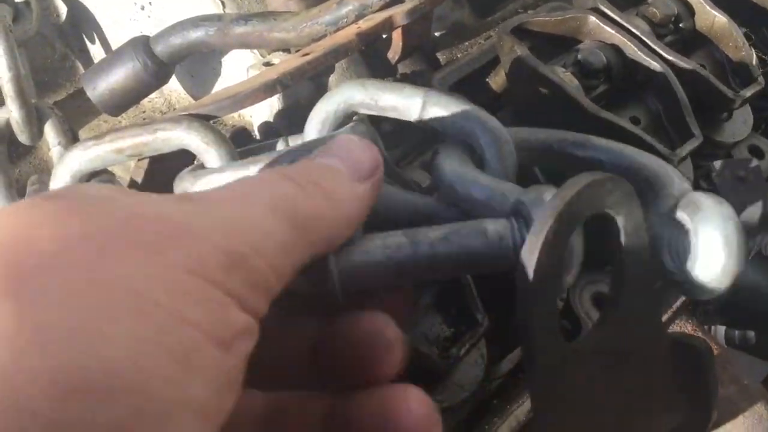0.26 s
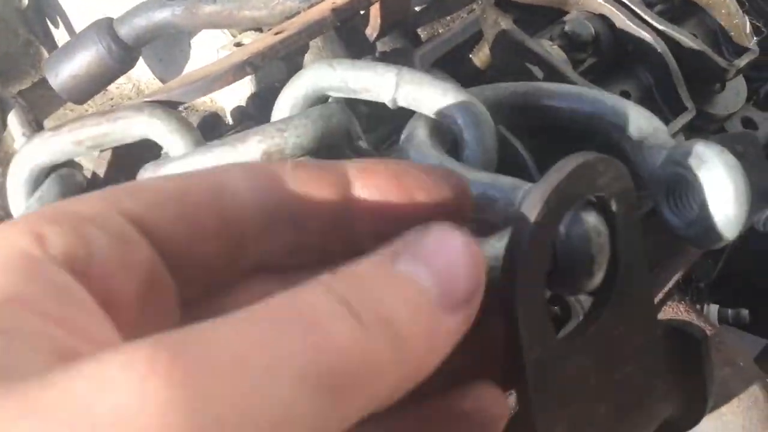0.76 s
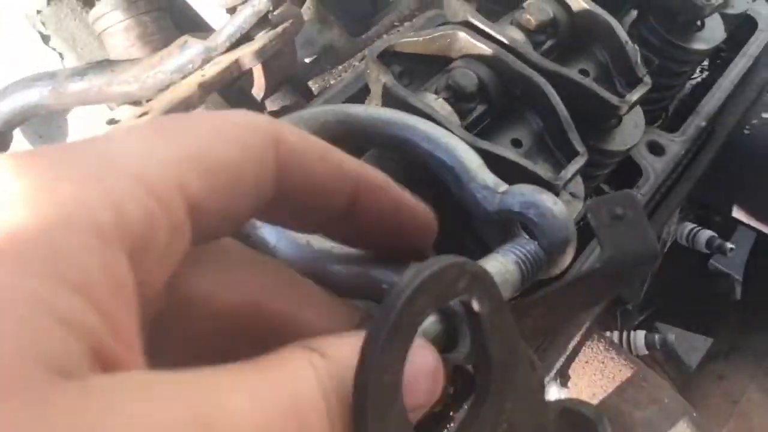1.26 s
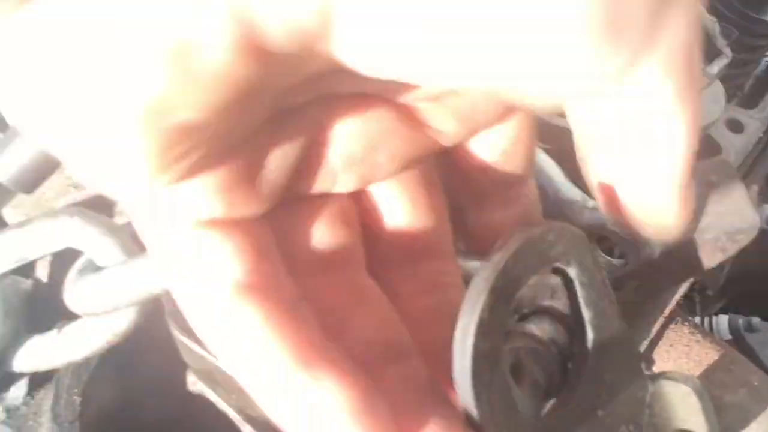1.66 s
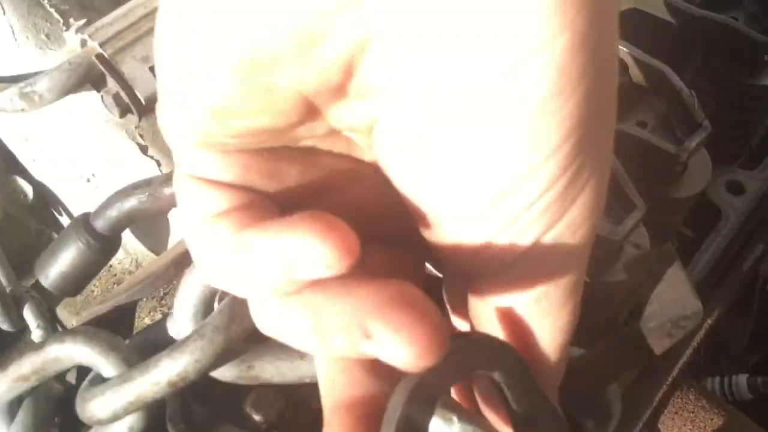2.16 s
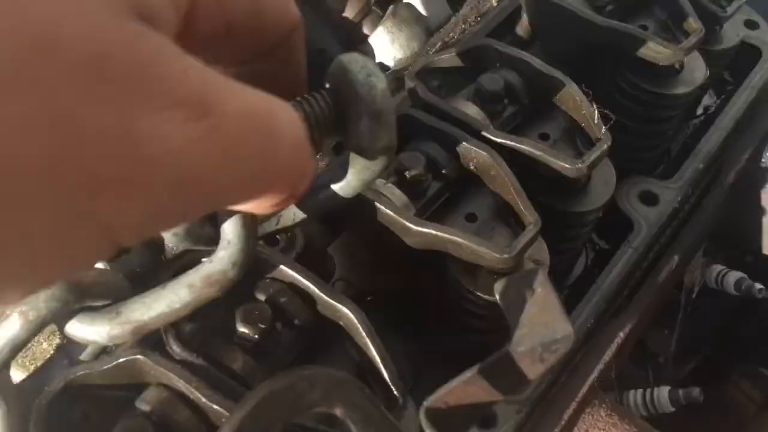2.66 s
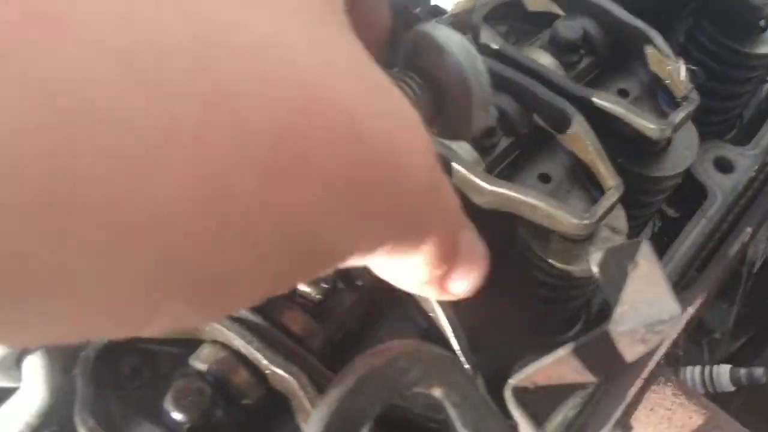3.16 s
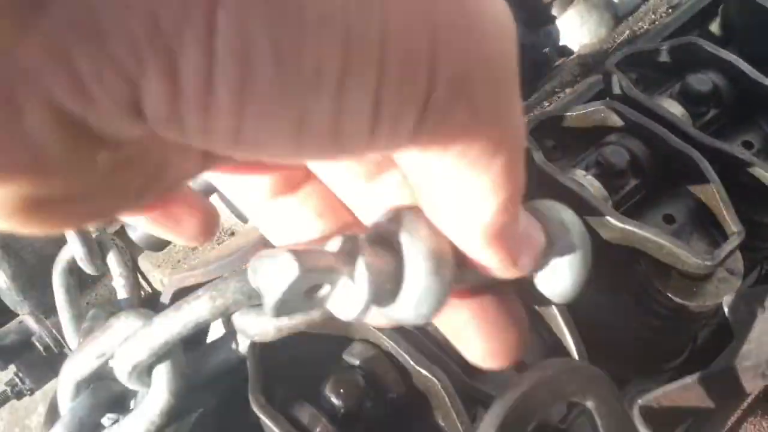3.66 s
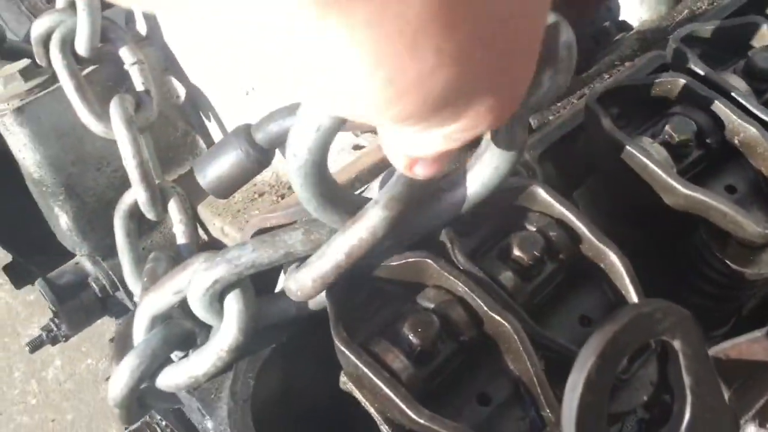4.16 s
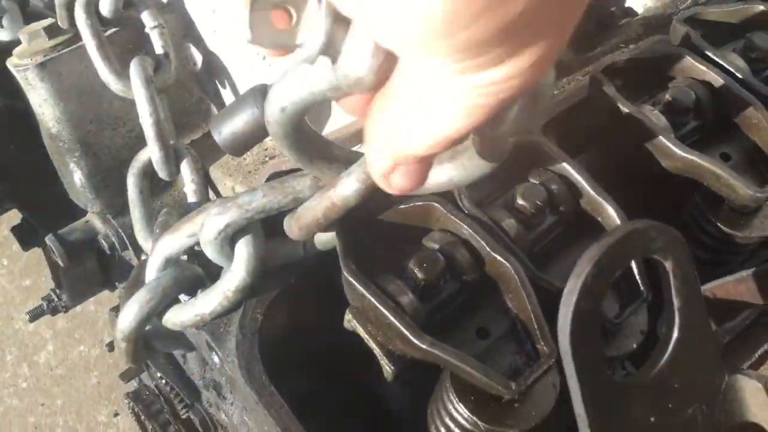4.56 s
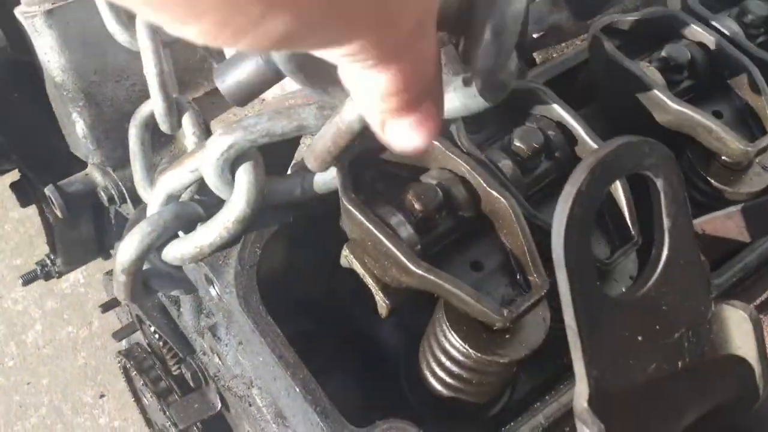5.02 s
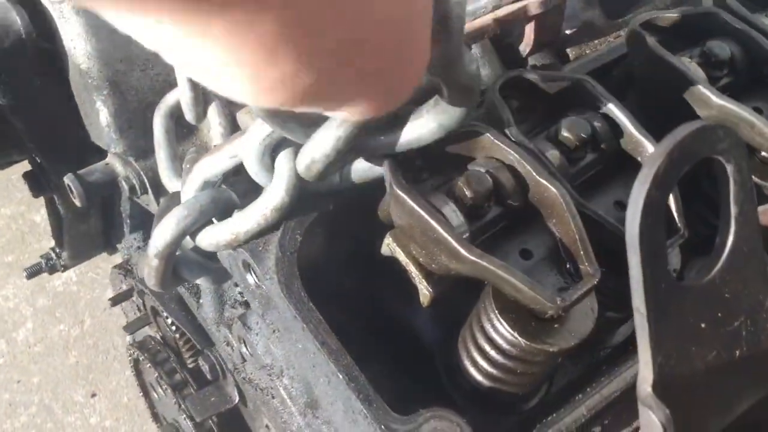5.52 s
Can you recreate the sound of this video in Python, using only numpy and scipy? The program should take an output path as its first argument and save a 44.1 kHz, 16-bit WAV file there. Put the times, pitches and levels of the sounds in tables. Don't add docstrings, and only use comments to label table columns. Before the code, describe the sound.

Close, bright metal knocks and jingling links with small thread scrapes as a shackle is worked loose, distant road hum swelling underneath.

```python
import sys
import numpy as np
from scipy import signal
from scipy.fft import rfft, irfft, next_fast_len
from scipy.io import wavfile
from scipy.ndimage import uniform_filter1d, minimum_filter1d, map_coordinates

SR = 44100
rng = np.random.default_rng(int(sys.argv[2]) if len(sys.argv) > 2 else 0)


def store_wav(level_fs):
    pcm = np.round(np.clip(np.atleast_2d(level_fs), -1, 1) * 32767)
    wavfile.write(sys.argv[1], SR, pcm.T.astype(np.int16))


def invert_db(level):
    return 10 ** (np.asarray(level, dtype=float) / 20)


N = 255318

# mode_hz [Hz], level_db [dB]
BRACKET = [(850, -16), (990, -15), (1360, -8), (1785, -8), (2200, -8), (2440, -4), (2620, -4), (3610, -6),
           (3940, -12), (4380, -6)]
BOW = [(4770, -12), (4920, -1.5), (5500, -12), (5850, -9), (7100, -6)]
LINKS = [(8600, -14), (9000, -16), (9995, -2), (10360, -4), (10970, -6), (11470, -8), (12075, -8)]
PIN = [(12460, -6), (12680, -3), (13300, -18), (13690, -4), (15395, -7)]
# mode_hz [Hz], level_db [dB]
FREE_BOW = [(4770, -1.5), (4920, -9), (5990, -1.5), (6915, -12), (7285, -4)]
FREE_LOW = [(1390, -6), (2530, -1.5), (4330, -9)]
FREE_LINKS = [(10010, -1), (10360, -3), (10970, -11), (11550, -12), (12075, -16)]

# start_s [s], bow_peak_db [dB], nearest_mode_hz [Hz], ring_t60_s [s],
# bracket_against_bow_db [dB]
PULL_HEAVY = [(0.0153, -10, 5780, 0.03, -7.5), (0.1719, -12.5, 4760, 0.031, -10),
              (0.1817, -5.5, 5900, 0.067, -10.5), (0.2635, -7.5, 5940, 0.019, -8),
              (0.2789, -9.5, 3530, 0.047, -6), (0.3359, -7.5, 2530, 0.067, 2.5),
              (0.6847, -10.5, 4930, 0.1, -2.5), (0.7144, -4, 7100, 0.058, -8.5),
              (0.7512, -14, 4920, 0.073, -7), (0.8193, -29, 2420, 0.19, 11),
              (0.857, -21, 2440, 0.036, -0.5), (0.9913, -13.5, 4930, 0.12, 1),
              (1.019, -27, 4930, 0.066, -2), (1.0333, -10.5, 4940, 0.12, -9.5),
              (1.0714, -17.5, 4930, 0.05, 2), (1.0779, -2, 4940, 0.036, -13.5),
              (1.1243, -19.5, 5050, 0.11, -9.5), (1.2419, -3.5, 4930, 0.072, -9),
              (1.365, -22.5, 5600, 0.052, -0.5)]
LIFT_HEAVY = [(1.5174, -17.5, 7270, 0.016, -6), (1.532, -17.5, 4950, 0.11, 1),
              (1.8571, 5.5, 7100, 0.011, -25), (2.0753, -11, 5500, 0.033, -3),
              (2.0946, -27, 2600, 0.096, 13.5), (2.1974, -14.5, 7040, 0.017, -14),
              (2.2238, -15, 7150, 0.027, -9.5), (2.4058, -2, 5480, 0.033, -8),
              (2.5289, -18.5, 7390, 0.13, -14.5), (2.5541, -3, 3890, 0.016, -8),
              (2.584, -2, 5900, 0.033, -5), (2.614, -10, 5940, 0.038, -3.5),
              (2.6602, -8.5, 4860, 0.039, -8)]
THREAD_HEAVY = [(3.039, -14.5, 5050, 0.02, -6.5), (3.0949, -10.5, 6000, 0.093, -9.5),
                (3.1244, -11, 7290, 0.05, -13), (3.139, -12.5, 4920, 0.052, -14),
                (3.3686, -6, 4750, 0.11, -7.5), (3.386, -22.5, 4740, 0.1, -15),
                (3.399, -9, 4760, 0.21, -29), (3.418, -6.5, 5980, 0.2, -28), (3.433, -4, 5950, 0.092, -22),
                (3.4364, 2.5, 5990, 0.13, -11.5), (3.48, -5, 5990, 0.042, -12.5),
                (3.5084, -20, 4930, 0.096, -14), (3.5216, -13.5, 4970, 0.041, -4.5),
                (3.5641, -12.5, 4850, 0.092, -4.5), (3.7293, -17, 5900, 0.04, -11),
                (3.932, -17.5, 4790, 0.27, -14), (3.971, -23.5, 4760, 0.24, -7),
                (4.0596, 3, 4770, 0.057, -34), (4.1599, 2, 7270, 0.073, -13.5),
                (4.128, -17.5, 7290, 0.19, -12), (4.167, -26, 2580, 0.098, 7.5),
                (4.223, -19, 5670, 0.017, -7)]
SCREW_HEAVY = [(4.559, -23.5, 4980, 0.032, 0), (4.7528, -28, 2540, 0.084, 3.5),
               (4.765, -12, 6020, 0.05, -29), (4.8264, -14, 3300, 0.034, 1.5),
               (4.8854, -14.5, 7330, 0.046, -14), (4.9269, -16.5, 7320, 0.045, -11),
               (4.977, -17, 7320, 0.042, -5.5), (4.9993, 8, 6010, 0.039, -24),
               (5.083, -13.5, 5400, 0.025, -5.5), (5.2706, -21.5, 5400, 0.055, -0.5),
               (5.29, -5.5, 6900, 0.05, -6.5), (5.317, -6, 7310, 0.025, -8),
               (5.3673, -12, 5780, 0.028, -6.5), (5.5526, -11, 7290, 0.071, -11),
               (5.586, -9, 7310, 0.041, -17)]
# start_s [s], links_peak_db [dB], nearest_mode_hz [Hz], ring_t60_s [s],
# pin_against_links_db [dB]
PULL_LIGHT = [(0.0162, -15, 9350, 0.015, -7), (0.1585, -34, 12400, 0.11, 8), (0.181, -21, 12400, 0.13, 7.5),
              (0.264, -23, 10100, 0.028, 3), (0.2778, -16, 12500, 0.029, 16.5),
              (0.3361, -5, 12100, 0.13, -11.5), (0.3365, 1, 11470, 0.039, -16.5),
              (0.338, -4.5, 10970, 0.1, -20), (0.6854, -18, 8610, 0.1, -3),
              (0.7025, -17.5, 12400, 0.094, 7.5), (0.7151, -13.5, 8620, 0.063, -6),
              (0.752, -17.5, 8600, 0.039, -25), (0.9922, -28.5, 8610, 0.21, -14.5),
              (1.0716, -20, 13700, 0.09, 1.5), (1.08, -13.5, 9970, 0.055, -27),
              (1.2421, -2.5, 10000, 0.048, -6), (1.2524, -14, 12700, 0.032, 8.5)]
LIFT_LIGHT = [(1.5295, -35.5, 12800, 0.058, 16), (1.8574, -10.5, 12600, 0.038, 15),
              (2.075, -24.5, 11600, 0.031, -20), (2.095, -20.5, 8980, 0.041, -28),
              (2.1982, -39, 12500, 0.13, 22), (2.2238, -18, 8470, 0.025, -20),
              (2.243, -23, 10900, 0.12, -38.5), (2.406, -12.5, 11600, 0.043, -3),
              (2.553, -20.5, 11600, 0.058, -4), (2.5848, -15, 11600, 0.055, -0.5),
              (2.6167, -6, 10100, 0.034, 2.5), (2.6605, -20.5, 10400, 0.044, 7.5)]
THREAD_LIGHT = [(3.0978, -11, 10000, 0.025, -6.5), (3.1246, -19.5, 12500, 0.1, 11.5),
                (3.372, -13.5, 12700, 0.1, 4.5), (3.3886, -11.5, 10400, 0.13, -24.5),
                (3.4303, -8, 9980, 0.23, -0.5), (3.4459, -11.5, 9990, 0.12, -0.5),
                (3.4661, -15, 12700, 0.065, 10.5), (3.483, -18.5, 11550, 0.11, -16.5),
                (3.564, -27.5, 15395, 0.11, 5.5), (3.7292, -40, 12600, 0.1, 5),
                (3.5193, -31.5, 12700, 0.07, 10), (3.924, -41, 12600, 0.078, 14),
                (3.9738, -26, 10000, 0.21, -21.5), (4.0615, -25.5, 13700, 0.082, 12),
                (4.1087, -21, 10900, 0.13, -11), (4.128, -19, 12500, 0.21, 11),
                (4.1599, -9.5, 12550, 0.081, 14.5), (4.1705, -8, 12700, 0.085, 4.5)]
SCREW_LIGHT = [(4.5615, -50, 12800, 0.025, 29.5), (4.8265, -25.5, 12100, 0.089, -4),
               (4.8853, -21, 12160, 0.034, 12), (4.9271, -31.5, 10500, 0.26, 3.5),
               (4.999, -8.5, 11000, 0.098, -1.5), (5.2926, -21, 10010, 0.1, -4),
               (5.291, -4.5, 10970, 0.1, -23), (5.294, -11, 12075, 0.11, -21),
               (5.3684, -18, 10100, 0.059, -2.5), (5.4277, -28, 13700, 0.054, 10.5),
               (5.553, -25, 10400, 0.07, 0.5), (5.586, -22, 11600, 0.054, -2)]
# start_s [s], peak_db [dB], nearest_mode_hz [Hz],
# links_and_pin_against_it_db [dB]
TAPS = [(0.151, -30, 2500, -23), (0.2278, -21, 2700, -9), (0.474, -37, 2850, -25),
        (0.897, -30.5, 1860, -17), (1.511, -25, 7400, -19), (2.4485, -21.5, 6130, -26),
        (3.072, -34, 2320, -22), (3.245, -22, 2520, -7), (3.3008, -23, 4900, -7), (3.3594, -15, 4770, -14),
        (4.003, -17, 6050, -19), (4.3525, -40, 7300, -2), (4.4084, -37.5, 2660, -34),
        (4.53, -34.5, 4330, -39), (4.588, -28.5, 5270, -11), (5.1454, -24.5, 2240, -12),
        (5.4296, -22.5, 6090, 2.5), (5.623, -23, 4980, -6), (5.756, -21.5, 2710, -17),
        (0.158, -23.5, 4770, -18), (0.333, -10.5, 5900, -8), (0.384, -23, 5850, -15),
        (0.9753, -38, 4940, -4), (1.3526, -39, 1950, -17), (1.8245, -31.5, 4870, -21),
        (1.877, -33, 3700, -20), (2.2923, -32, 2990, -23), (2.364, -37, 2760, -20), (2.391, -27, 3750, -17),
        (2.445, -25, 3800, -18), (2.4723, -27, 6160, -20), (2.5102, -31, 4990, -1),
        (3.0194, -45, 2540, -30), (3.207, -32.5, 2510, -7), (3.3326, -25, 1520, -19),
        (3.8904, -40, 1810, -9), (4.016, -25, 7280, -20), (4.0415, -37, 6000, -8), (4.0807, -23, 4770, -6),
        (4.108, -17.5, 4300, -15), (4.239, -29, 3600, -24), (2.75, -40, 6900, -20),
        (4.6633, -27.5, 2040, -14), (4.726, -32, 3000, -15), (4.9615, -26, 1870, -22),
        (5.1773, -32, 1840, -19), (5.2573, -42, 2020, -8), (5.384, -20.5, 6000, -9),
        (5.459, -21, 4990, -23)]
# start_s [s], peak_db [dB], mode_hz [Hz], ring_t60_s
# [s]
RINGS = [(0.0153, -13, 9450, 0.026), (4.9264, -28, 7320, 0.15), (0.1847, -13, 11500, 0.022),
         (0.2781, -12, 6420, 0.021), (0.3333, -23, 3905, 0.049), (0.3433, -20.5, 2466, 0.078),
         (1.5315, -26.5, 3580, 0.18), (0.6874, -16.5, 4370, 0.062), (0.7091, -16.5, 6020, 0.034),
         (0.7155, -16, 9500, 0.027), (0.7165, -21, 7100, 0.07), (0.7209, -15, 4220, 0.028),
         (0.9918, -10.5, 4937, 0.11), (1.0781, -14.5, 5960, 0.024), (0.392, -28, 4930, 0.18),
         (1.2405, -12, 4040, 0.052), (1.5315, -17, 5000, 0.07), (1.2442, -6, 10360, 0.036),
         (1.2535, -14.5, 7100, 0.04), (2.4061, -13, 8800, 0.021), (2.4076, -14, 11640, 0.032),
         (2.5528, -14, 3840, 0.037), (5.586, -22.5, 6000, 0.076), (4.0595, -20.5, 15420, 0.15),
         (1.5315, -26.5, 1787, 0.08), (3.0955, -9.5, 6260, 0.014), (3.3767, -15.5, 13520, 0.2),
         (3.3896, -11, 11600, 0.049), (3.4041, -23.5, 12470, 0.043), (3.4363, -16, 15620, 0.1),
         (3.4372, -5.5, 4700, 0.085), (3.4449, -11.5, 13680, 0.142), (3.4449, -10.5, 10180, 0.052),
         (3.4559, -7, 10340, 0.026), (3.4668, -19, 6980, 0.073), (3.4676, -14.5, 12700, 0.048),
         (3.5084, -20.5, 4300, 0.096), (4.0585, -10, 7310, 0.06), (4.1606, -12, 10365, 0.12),
         (5.0058, -20, 13740, 0.082), (5.2901, -19.5, 13900, 0.035), (5.2903, -12, 5940, 0.027),
         (5.2935, -18, 7320, 0.1), (5.2966, -18, 10010, 0.072), (2.096, -38, 4920, 0.09)]

# start_s [s], length_s [s], bracket_db [dB], links_and_pin_against_it_db [dB]
STROKES = [(0, 0.0029, -35.5, -10.5), (0.184, 0.013, -30, -11.5), (0.294, 0.0098, -61, 7),
           (0.359, 0.067, -33, -27.5), (0.51, 0.05, -75.5, 11.5), (0.715, 0.011, -31.5, -13),
           (0.822, 0.037, -54.5, -1), (1.004, 0.065, -39.5, -5), (1.142, 0.12, -36, -10.5),
           (1.387, 0.059, -64.5, -9), (1.494, 0.082, -51, 0.5), (1.736, 0.15, -60.5, 5),
           (2.021, 0.054, -46, -15.5), (2.147, 0.031, -69.5, 5), (2.26, .1, -77, 4),
           (2.215, 0.037, -42, -19.5), (2.417, 0.011, -31.5, -5), (2.532, 0.13, -41.5, -9.5),
           (2.895, 0.043, -58, 0), (3.091, 0.031, -37.5, 1), (3.351, 0.082, -34, -5),
           (3.473, 0.1, -40.5, -18.5), (3.705, 0.02, -55, 2), (3.778, 0.077, -63.5, -0.5),
           (3.915, 0.28, -46, 0), (4.288, 0.19, -70, -3.5), (4.572, 0.2, -51, -10.5),
           (4.838, 0.12, -51.5, -35.5), (5.108, 0.067, -53, -10.5), (5.277, 0.34, -47.5, -6.5),
           (5.77, .05, -57, 1.5)]
# start_s [s], length_s [s], level_db [dB]
PIN_STROKES = [
    (0.463, 0.15, -61.5),
    (1.417, 0.06, -57.5),
    (1.705, 0.083, -58),
    (3.79, 0.072, -51),
    (4.45, .07, -65),
    (4.626, 0.11, -44),
    (5.65, 0.029, -61),
]
# start_s [s], length_s [s], mode_hz [Hz], level_db [dB]
SINGING = [
    (1.145, .085, 4920, -33),
    (3.933, .06, 7280, -35),
    (1.25, .3, 850, -56),
    (1.18, .06, 990, -42),
    (1.015, .085, 990, -42),
    (1.15, .08, 1785, -46),
    (0.16, .06, 4840, -23),
]
# start_s [s], peak_db [dB], mode_hz
# [Hz], t60_s [s]
THUDS = [(0.275, -36.5, 127, 0.083), (1.579, -37.5, 254, 0.073), (2.1, -39, 535, 0.067),
         (2.223, -30.5, 1086, 0.054), (2.406, -30.5, 420, 0.028), (2.45, -32, 300, 0.054),
         (2.585, -32, 330, 0.041), (2.7, -39.5, 1330, 0.099), (0.992, -33, 975, 0.054),
         (2.098, -38, 1360, 0.33), (3.567, -25, 1400, 0.085)]

# start_s [s], length_s [s], pitch_hz [Hz], level_db [dB], wavering_pace [ratio]
FAR_TONES = [
    (4.186, 0.93, 192.7, -50, .2),
    (4.396, 1.35, 277.1, -51.5, 0.16),
]
# time_s [s], rumble_db [dB], tyre_hiss_db [dB]
TRAFFIC = [
    (0, -54.5, -58),
    (3.4, -54, -52.5),
    (3.8, -48.5, -52),
    (4.55, -46.5, -51),
    (5.2, -46.5, -51),
    (5.79, -49.5, -49.5),
]
# frequency_hz [Hz], density_db [dB per Hz]
RUMBLE = [(30, -42), (70, -21.5), (95, -5), (150, -12), (195, -2.5), (290, -0.5), (390, -13), (1100, -90)]
TYRES = [(200, -32.5), (350, 4.5), (1200, 6), (1600, 2), (2500, -8), (5000, -46.5), (16000, -47.5)]

SEATED_HEAVY, FREE_HEAVY = PULL_HEAVY + LIFT_HEAVY, THREAD_HEAVY + SCREW_HEAVY
SEATED_LIGHT, FREE_LIGHT = PULL_LIGHT + LIFT_LIGHT, THREAD_LIGHT + SCREW_LIGHT
COVERED_S, LIFTED_S, FREED_S = 1.7, 2.15, 2.9
BRACKET_OUTLASTS, PIN_OUTLASTS = 1, 0.69
PLATE_CRACK_S = 0.07
PLATE_CHATTER, STEEL_CHATTER = 0.25, 0.17


def unit(x):
    return x / np.sqrt(np.mean(x ** 2) + 1e-20)


def filtered(x, response):
    m = next_fast_len(len(x) + 8192)
    return irfft(rfft(x, m) * response(np.fft.rfftfreq(m, 1 / SR)), m)[:len(x)]


def band(x, lo_hz, hi_hz):
    return signal.sosfilt(signal.butter(2, [lo_hz, hi_hz], "band", fs=SR, output="sos"), x)


def wobble(rate):
    coarse = np.arange(0, N + 16, 16)
    knots = rng.standard_normal(int(N * rate / SR) + 4)
    return np.interp(np.arange(N), coarse, map_coordinates(knots, [coarse * rate / SR]))


def shared(hits, own, other, outlasts):
    def strongest(modes):
        return max(modes, key=lambda mode: mode[1])[0]

    def gap(hz, modes):
        return min(abs(hz - mode[0]) for mode in modes)

    first, second = [], []
    for s, db, hz, t60, other_db in hits:
        on_own = gap(hz, own) < gap(hz, other)
        first.append((s, db, hz if on_own else strongest(own), t60))
        second.append((s, db + other_db, strongest(other) if on_own else hz, t60 * outlasts))
    return first, second


def struck(hits, modes, lo_hz, focus_db, crack_db, crack_t60, chatter):
    out, longest = np.zeros(N + SR), SR // 6
    mode_hz, mode_db = np.transpose(modes)
    mode_life = np.clip(3000 / mode_hz, 1.1, 2.5)
    luck = rng.standard_normal((len(hits), len(modes)))
    knots = rng.standard_normal((len(hits), 2, len(modes), longest // 128 + 2))
    white = rfft(rng.standard_normal((len(hits), longest)))
    log_size = np.log(abs(white))
    uneven = uniform_filter1d(log_size, size=14, axis=1)[::-1] - log_size.mean()
    crowd = invert_db(7 * unit(uneven))
    grit = band(irfft(white * crowd, longest), lo_hz, mode_hz[-1])
    grit /= grit.std(1, keepdims=True)
    for (s, db, near_hz, t60), chance, jolt, noise in zip(hits, luck, knots, grit):
        hz, level = mode_hz.copy(), mode_db + 3 * chance - focus_db
        nearest = np.argmin(abs(mode_hz - near_hz))
        level[nearest] = 0
        if abs(near_hz / hz[nearest] - 1) > 0.04:
            hz[nearest] = near_hz
        lives = np.clip(t60 * mode_life, 0.008, 0.2)[:, None]
        sample = np.arange(min(longest, int(lives.max() * SR)))
        t, step, part = sample / SR, sample // 128, sample % 128 / 128
        size, turn = chatter * (jolt[..., step] * (1 - part) + jolt[..., step + 1] * part)
        decay = invert_db(level[:, None] - 60 * t / lives)
        ring = decay * (1 + size) * np.sin(2 * np.pi * hz[:, None] * t + turn)
        crack = invert_db(crack_db - 60 * t / np.minimum(crack_t60, t60)) * noise[sample]
        blow = ring.sum(0) + crack
        blow *= (1 - np.exp(-t / 0.0001)) * (1 - t / t[-1])
        out[round(s * SR):][:len(t)] += invert_db(db) * blow / abs(blow).max()
    return out[:N]


def taps():
    low = [(s, db, hz, 0.035) for s, db, hz, _ in TAPS]
    high = [(s, db + light_db, PIN[1][0], 0.06) for s, db, _, light_db in TAPS]
    heavy = struck(low, FREE_LOW + FREE_BOW, 1500, focus_db=7, crack_db=6, crack_t60=0.022, chatter=0.5)
    light = struck(high, FREE_LINKS + PIN, 8000, focus_db=12.5, crack_db=-6.5, crack_t60=0.021, chatter=0.53)
    return heavy + light


def knocks():
    seated_bow, seated_low = shared(SEATED_HEAVY, BOW, BRACKET, BRACKET_OUTLASTS)
    free_bow, free_low = shared(FREE_HEAVY, FREE_BOW, FREE_LOW, BRACKET_OUTLASTS)
    link_hits, pin_hits = shared(SEATED_LIGHT + FREE_LIGHT, LINKS, PIN, PIN_OUTLASTS)
    seated_links, free_links = link_hits[:len(SEATED_LIGHT)], link_hits[len(SEATED_LIGHT):]
    plate_like = dict(crack_t60=PLATE_CRACK_S, chatter=PLATE_CHATTER)
    bracket = struck(seated_low, BRACKET, 1695, focus_db=6, crack_db=6, **plate_like)
    bracket += struck(free_low, FREE_LOW, 1470, focus_db=4.5, crack_db=7.5, **plate_like)
    bow = struck(seated_bow, BOW, 4230, focus_db=12.5, crack_db=0.5, crack_t60=0.035, chatter=STEEL_CHATTER)
    bow += struck(free_bow, FREE_BOW, 3600, focus_db=6, crack_db=3, crack_t60=0.006, chatter=STEEL_CHATTER)
    links = struck(seated_links, LINKS, 9000, focus_db=17, crack_db=-10, crack_t60=0.12,
                   chatter=STEEL_CHATTER)
    links += struck(free_links, FREE_LINKS, 10850, focus_db=10, crack_db=-9, crack_t60=0.05,
                    chatter=STEEL_CHATTER)
    pin = struck(pin_hits, PIN, 9200, focus_db=12, crack_db=-17.5, crack_t60=0.056, chatter=STEEL_CHATTER)
    return band(bracket + bow + links + pin + taps(), 500, 19000)


def single_modes():
    any_mode = [(16300, 0)]
    return struck(RINGS, any_mode, 2000, focus_db=0, crack_db=-20, crack_t60=0.01, chatter=STEEL_CHATTER)


def rubbed(modes, dull_db, width_hz=24):
    catches = invert_db(6) * (rng.random(N) < 200 / SR)
    slips = rng.standard_normal(N) * (1 + catches) * invert_db(3.5 * wobble(250) + 2 * wobble(30))

    def steel(f):
        return sum(invert_db(db) * 1j * f * width_hz / (c * c - f * f + 1j * f * width_hz) for c, db in modes)

    dull = unit(band(slips, modes[0][0], modes[-1][0]))
    return unit(unit(filtered(slips, steel)) + invert_db(dull_db) * dull)


def swell(start, length, db):
    rise_db_per_s, fall_db_per_s = 506, 269
    t = np.arange(0, N + 64, 64) / SR
    start, length, db = start[:, None], length[:, None], db[:, None]
    before, after = np.maximum(start - t, 0), np.maximum(t - start - length, 0)
    gain = invert_db(db - rise_db_per_s * before - fall_db_per_s * after)
    return np.interp(np.arange(N) / SR, t, gain.sum(0))


def skid(hits):
    skid_db, fall_db_per_s = -40.5, 499.5
    kicks = np.zeros(N)
    for s, db, *_ in hits:
        kicks[round(s * SR)] = invert_db(db + skid_db)
    return signal.lfilter([1], [1, -invert_db(-fall_db_per_s / SR)], kicks)


def shifting(x):
    z = signal.stft(x, nperseg=256)[2]
    field = uniform_filter1d(rng.standard_normal(z.shape), 3, 0)
    field = uniform_filter1d(field, 16, 1)
    return signal.istft(z * invert_db(3 * unit(field)), nperseg=256)[1][:N]


def scrape():
    start, length, db, light_db = np.transpose(STROKES)
    heavy_skid = skid(SEATED_HEAVY + FREE_HEAVY)
    light_skid = skid(SEATED_LIGHT + FREE_LIGHT)
    seated = np.arange(N) < FREED_S * SR
    bare = np.arange(N) < COVERED_S * SR
    bracket = np.where(bare, rubbed(BRACKET, dull_db=-7, width_hz=32),
                       rubbed(FREE_LOW, dull_db=6, width_hz=110))
    bow = np.where(seated, rubbed(BOW, dull_db=-10), rubbed(FREE_BOW, dull_db=-13))
    light = np.where(seated, rubbed(LINKS + PIN, dull_db=-7), rubbed(FREE_LINKS + PIN, dull_db=-8))
    pin = swell(*np.transpose(PIN_STROKES)) * rubbed(PIN, dull_db=-17.5, width_hz=98)
    bracket_gain = swell(start, length, db) + heavy_skid
    bow_gain = swell(start, length, db - 4.5 + 0.29 * light_db) + heavy_skid
    light_gain = swell(start, length, db + light_db) + light_skid
    return shifting(bracket_gain * bracket + bow_gain * bow + light_gain * light + pin)


def held_tones(rows):
    t, out = np.arange(N) / SR, np.zeros(N)
    for start, length, hz, db, pace in rows:
        held = uniform_filter1d(1.0 * ((t > start) & (t < start + length)), size=300)
        gain = held * invert_db(db + 2.5 * wobble(80 * pace))
        out += gain * np.sin(2 * np.pi * hz * t + 0.7 * wobble(150 * pace))
    return out


def singing():
    return held_tones([(*row, 1 if row[2] > 4000 else 0.15) for row in SINGING])


def plate():
    kicks = np.zeros(N)
    for s, db, _, _, bracket_db in SEATED_HEAVY:
        kicks[round(s * SR)] = invert_db(db + bracket_db) * (s < LIFTED_S)
    low = [BRACKET[k][0] for k in (0, 1, 2, 3, 5)]
    width_hz = 9

    def hum(f):
        return sum(1j * f / (c * c - f * f + 1j * f * width_hz) for c in low)

    return invert_db(-60.5) * SR * filtered(kicks, hum)


def thuds():
    out, t = np.zeros(N + SR), np.arange(SR // 5) / SR
    for s, db, hz, t60 in THUDS:
        envelope = invert_db(db - 60 * t / t60) * (1 - np.exp(-t / 0.002))
        out[round(s * SR):][:len(t)] += envelope * np.sin(2 * np.pi * hz * t)
    return out[:N]


def far_engines():
    return held_tones(FAR_TONES)


def tyre_whine():
    pitch_hz, peak_s, peak_db, slope_db_per_s = 983, 5.55, -48.5, 18
    whine = unit(band(rng.standard_normal(N), pitch_hz - 55, pitch_hz + 55))
    return whine * invert_db(peak_db - slope_db_per_s * abs(np.arange(N) / SR - peak_s))


def traffic():
    drone_db, drone_top_hz = -63.5, 152
    time_s, *levels = np.transpose(TRAFFIC)
    rumble_db, hiss_db = [np.interp(np.arange(N) / SR, time_s, level) for level in levels]

    def colour(points, f):
        hz, db = np.transpose(points)
        return invert_db(np.interp(np.log(f + 1), np.log(hz), db))

    drone = unit(filtered(rng.standard_normal(N), lambda f: colour(RUMBLE, f) * (f < drone_top_hz)))
    rumble = unit(filtered(rng.standard_normal(N), lambda f: colour(RUMBLE, f) * (f >= drone_top_hz)))
    hiss = unit(filtered(rng.standard_normal(N), lambda f: colour(TYRES, f)))
    rumble *= invert_db(rumble_db + 1.5 * wobble(11))
    hiss *= invert_db(hiss_db + 2.2 * wobble(15))
    return invert_db(drone_db) * drone + rumble + hiss


def scene():
    steel = knocks() + single_modes() + scrape() + singing() + plate() + thuds()
    road = far_engines() + tyre_whine() + traffic()
    return (steel + road)[None]


def roll_off(x):
    return signal.sosfilt(signal.butter(12, 16810, fs=SR, output="sos"), x)


def record(dry):
    x = filtered(dry[0], lambda f: np.clip((16550 - f) / 900, 0.03, 1))
    gain = minimum_filter1d(1 / np.maximum(abs(x), 1), size=65)
    limited = x * uniform_filter1d(gain, size=33)
    mix = filtered(limited, lambda f: np.clip(f / 80, 0, 1))
    return roll_off(mix[None])


dry = scene()
out = record(dry)
store_wav(out)
```